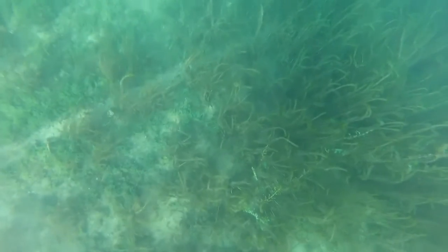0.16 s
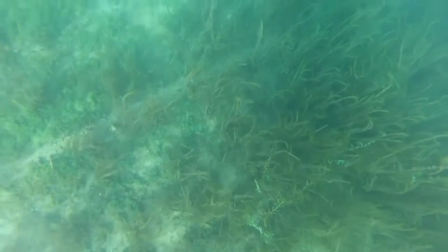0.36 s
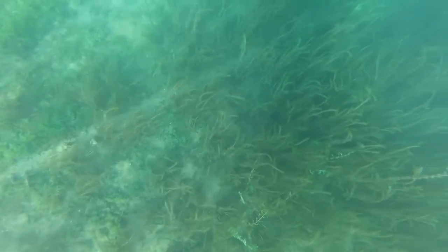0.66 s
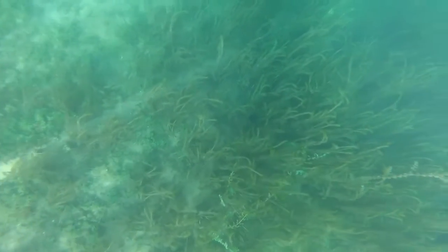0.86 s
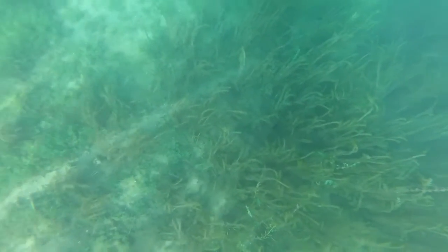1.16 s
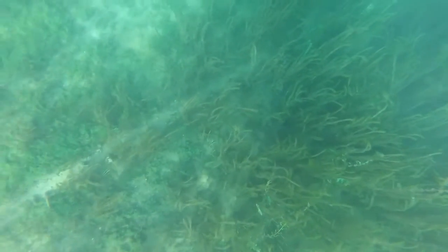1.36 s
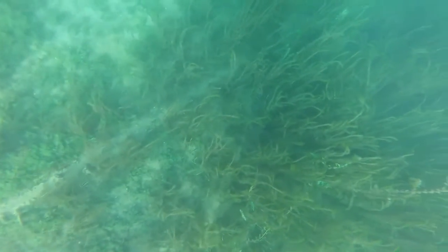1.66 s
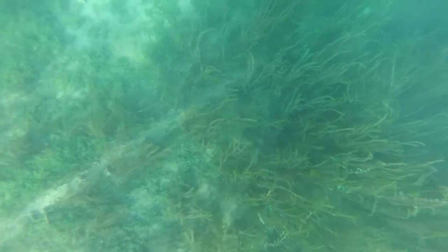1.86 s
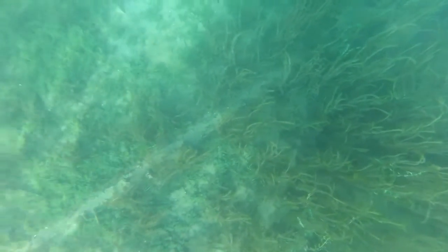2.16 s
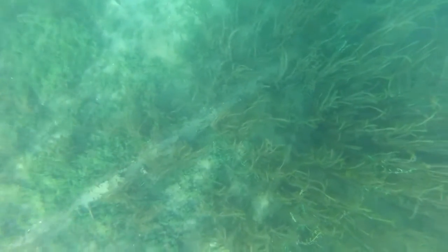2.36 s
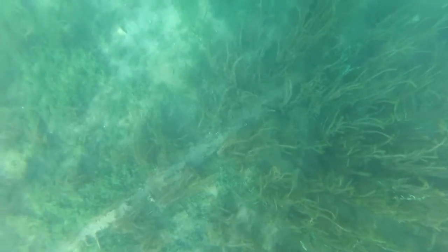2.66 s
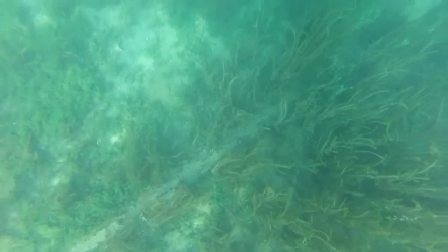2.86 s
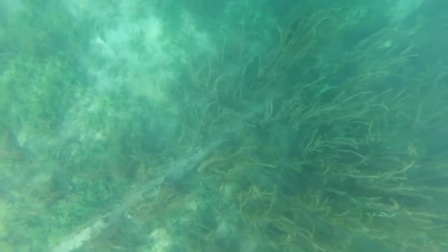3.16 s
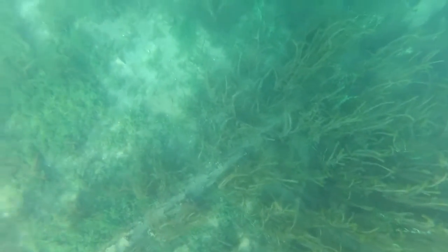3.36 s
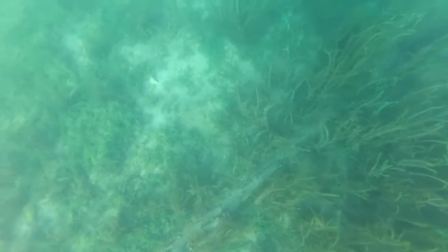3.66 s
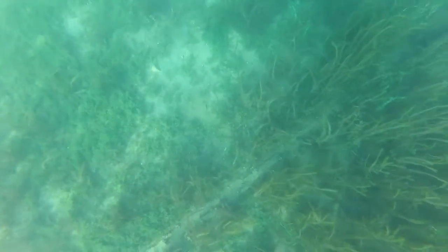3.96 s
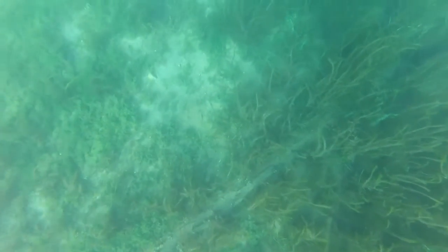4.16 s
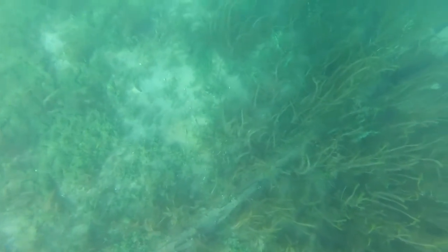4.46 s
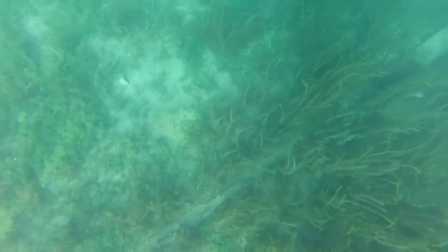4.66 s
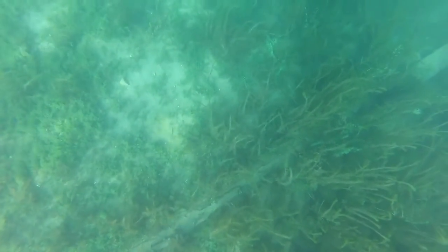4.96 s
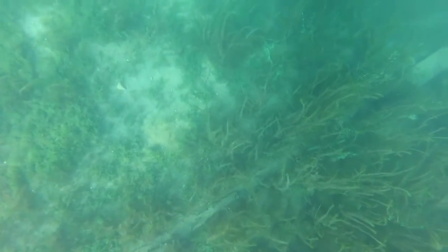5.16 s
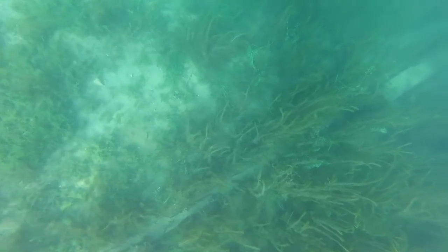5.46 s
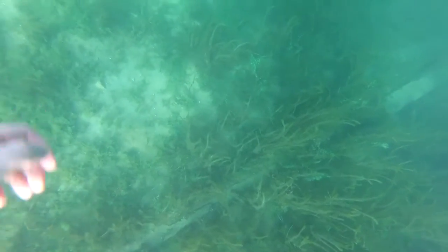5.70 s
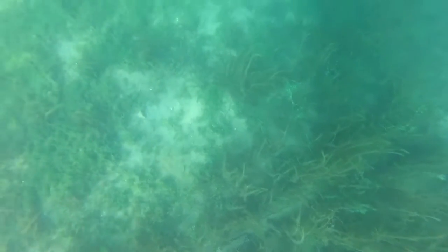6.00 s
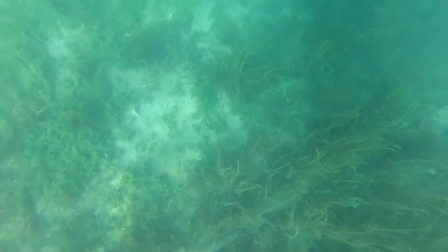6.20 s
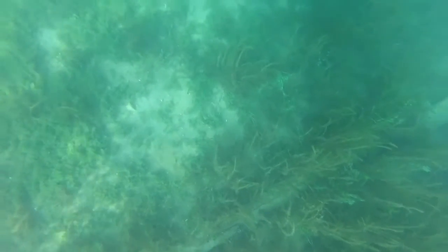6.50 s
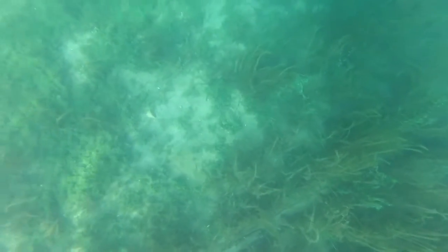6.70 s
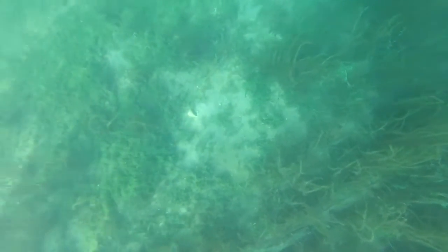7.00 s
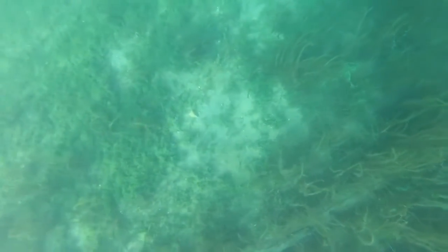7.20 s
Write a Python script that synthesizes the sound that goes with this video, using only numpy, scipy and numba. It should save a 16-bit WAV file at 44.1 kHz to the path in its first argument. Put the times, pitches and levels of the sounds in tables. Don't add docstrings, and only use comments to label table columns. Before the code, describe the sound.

Muffled underwater rumble with heavy low thumps, gulping trapped air, soft bubbling wash, a quick triple knock early on and faint hiss.

```python
import sys
import numpy as np
from scipy import signal
from scipy.fft import rfft, irfft, next_fast_len
from scipy.io import wavfile
from scipy.ndimage import uniform_filter1d
from numba import njit

SR = 44100
rng = np.random.default_rng(int(sys.argv[2]) if len(sys.argv) > 2 else 0)


def dump(signal):
    limited = np.clip(np.atleast_2d(signal).T, -1, 1)
    pcm = np.round(limited * 32767).astype(np.int16)
    wavfile.write(sys.argv[1], SR, pcm)


def gain_from_db(level_db):
    decades = np.asarray(level_db, float) / 20
    return 10 ** decades


N = 323694

# (time [s], level [dB])
GAIN = [
    (0, -70),
    (1.19, -66),
    (1.21, -67),
    (3, -65),
    (4.91, -63),
    (4.93, -67),
    (5.6, -65),
    (7.34, -64),
]
# (time [s], level [dB])
WATER = [(0.0, -35), (0.31, -37), (0.75, -34.5), (1.31, -33.5), (1.92, -35.5), (2.27, -36), (2.82, -34),
         (3.31, -36.5), (3.9, -34.5), (4.4, -32), (4.85, -34), (4.93, -38), (5.5, -38.5), (6.15, -33.5),
         (6.66, -35.5), (7.0, -32), (7.34, -34)]


def unit(x):
    return x / np.sqrt(np.mean(x ** 2))


def curve(table, column):
    rows = np.array(table)
    return np.interp(np.arange(N) / SR, rows[:, 0], rows[:, column])


def bumps(table, half_s):
    t = np.arange(N) / SR
    return sum(db * np.exp(-((t - s) / half_s) ** 2) for s, db in table)


def walk(rate_hz):
    hold = int(SR / rate_hz)
    steps = np.repeat(rng.standard_normal(N // hold + 1), hold)
    return unit(uniform_filter1d(uniform_filter1d(steps, hold), hold)[:N])


def colour(x, spectrum):
    hz, db = np.transpose(spectrum)
    size = next_fast_len(N)
    log_hz = np.log(np.fft.rfftfreq(size, 1 / SR) + 1)
    shape_db = np.interp(log_hz, np.log(hz), db, left=-90, right=-90)
    return irfft(rfft(x, size) * gain_from_db(shape_db), size)[:N]


def resonance(x, hz, width_hz):
    return signal.lfilter(*signal.iirpeak(hz, hz / width_hz, fs=SR), x)


@njit
def grains(start, size, hz, cycles, phase, rise, glide):
    out = np.zeros(N)
    for g in range(len(start)):
        length = cycles[g] * SR / hz[g]
        p = phase[g]
        for i in range(min(int(3 * length), N - start[g])):
            u = i / (rise * length)
            if u < 1:
                swell = np.sin(np.pi / 2 * u) ** 2
            else:
                swell = np.exp(-((u - 1) * rise / (1 - rise)) ** 1.5 * 2)
            p += 2 * np.pi * hz[g] * (1 + glide * i / length) / SR
            out[start[g] + i] += size[g] * swell * np.sin(p)
    return out


def played(table, trim_db, rise, glide, length_ms=None, cycles=None):
    s, db, hz, *own_ms = np.transpose(table)
    if cycles is None:
        cycles = hz * (own_ms[0] if own_ms else length_ms) / 1000
    phase = rng.uniform(0, 2 * np.pi, len(s))
    return grains((s * SR).astype(np.int64), gain_from_db(db + trim_db), hz, cycles + 0 * hz, phase, rise, glide)


def cloud(count, low_hz, high_hz, cycles, scatter_db, rise, glide):
    when, pitch, luck, phase, long = rng.random((count, 5)).T
    hz = low_hz * (high_hz / low_hz) ** pitch
    size = hz * gain_from_db(np.minimum(-scatter_db * np.log(1 - luck), 4 * scatter_db))
    start = (when * N).astype(np.int64)
    return grains(start, size, hz, cycles * (.5 + long), 2 * np.pi * phase, rise, glide)


def buffeting():
    # (time [s], level [dB])
    flow = [(0.1, -20.5), (0.3, -30), (0.88, -33.5), (1.38, -22.5), (1.98, -32), (2.12, -25), (2.77, -27.5),
            (2.99, -22), (3.4, -31.5), (4.03, -26.5), (4.41, -28.5), (4.81, -26), (5.17, -34.5),
            (5.81, -20.5), (6.06, -30.5), (6.32, -22.5), (6.8, -32.5), (7.1, -26)]
    # (time [s], level change [dB])
    lulls = [
        (0.58, -8),
        (1.86, -5),
        (2.87, -9),
        (4.26, -5),
        (5.4, -2.5),
        (6.56, -2.5),
    ]
    # (frequency [Hz], level per Hz [dB])
    eddy_spectrum = [(8.8, -36), (15, -6), (43, 1), (94, -4), (122, -6.5), (210, -21), (286, -27.5),
                     (330, -24), (430, -55), (730, -120)]
    # (onset [s], peak [dB], frequency [Hz])
    pushes = [(0.253, -11.5, 46.3), (0.685, -6, 102), (1.189, -15.5, 80), (1.41, -11, 75.5),
              (1.47, -8, 56.5), (1.518, -14, 63), (1.683, -11.5, 47.4), (1.959, -14.5, 59.5),
              (2.07, -10.5, 45.8), (2.142, -8, 70), (2.7, -18.5, 66.6), (2.801, -15.5, 119),
              (2.943, -10.5, 103), (3.033, -11.5, 62.4), (3.551, -13, 45.4), (4.081, -5.5, 52.7),
              (4.339, -17, 80), (4.602, -12, 45.8), (4.647, -8, 46), (5.121, -12.5, 45.8),
              (5.65, -8.5, 53.5), (5.782, -7, 75), (5.877, -10, 56.5), (5.985, -8.5, 45.5),
              (6.16, -14, 94.4), (6.356, -6.5, 103), (6.404, -7, 69.6), (6.921, -15, 71.4), (7.14, -14, 60),
              (7.224, -7, 60.4)]
    # (onset [s], peak [dB], frequency [Hz])
    slaps = [(0.127, -20, 94), (0.189, -15, 97.5), (0.767, -20, 135), (1.72, -17, 105), (1.788, -21, 98),
             (2.455, -4, 99.4), (2.71, -18.5, 148), (3.119, -13, 101), (3.88, -11.5, 108),
             (4.482, -21.5, 95), (4.947, -4, 98.7), (5.669, -13, 97.7), (5.888, -11.5, 94),
             (5.987, -13, 122), (6.299, -16.5, 122), (6.571, -17, 134), (7.239, -13, 137)]
    # (onset [s], peak [dB], frequency [Hz])
    rolls = [(0.022, -5, 80.2), (0.06, -12, 55.6), (1.248, -2.5, 52.4), (1.359, -9, 46.5),
             (2.43, -7.5, 66.6), (2.49, -15.5, 94.8), (3.102, -12, 46.3), (3.863, -11, 102.7),
             (4.937, -11, 77), (5.581, -10.5, 37.7), (5.829, -14.5, 75.6), (5.929, -8.5, 51.7),
             (6.38, -10.5, 53), (6.447, -9, 43.1), (7.207, -10.5, 82.7), (7.269, -16, 76.8)]
    small = cloud(count=2200, low_hz=17.8, high_hz=328.0, cycles=2.05, scatter_db=0.3, rise=0.37, glide=0.015)
    level_db = curve(flow, 1) + bumps(lulls, half_s=0.046) + 2.34 + 1.5 * walk(7.2)
    bed = unit(colour(small, eddy_spectrum)) * gain_from_db(level_db)
    opening_db, opening_s = -11.5, 0.0031
    bed -= gain_from_db(opening_db) * np.exp(-np.arange(N) / SR / opening_s)
    strong = played(pushes, -1.5, rise=0.46, glide=0.001, length_ms=30)
    strong += played(slaps, -1.1, rise=0.31, glide=0.001, length_ms=35.2)
    strong += played(rolls, -2.3, rise=0.1, glide=-0.013, length_ms=85.5)
    return bed + strong


def fizz_level():
    # (time [s], lift [dB])
    puffs = [
        (1.68, 2.5),
        (2.27, 3),
        (3.4, 2),
        (3.88, 3.5),
        (4.3, 2.5),
        (4.74, 4.5),
        (5.64, 7),
        (7.3, 4.5),
    ]
    wash_db, fizz_db = -35, -53.5
    follow_db_per_db = 0.37
    return fizz_db + follow_db_per_db * (curve(WATER, 1) - wash_db) + bumps(puffs, half_s=0.15)


def wash():
    # (frequency [Hz], level per Hz [dB])
    wash_spectrum = [(120, -33), (200, -9), (288, -9), (387, -5.5), (498, -0.5), (677, -3.5), (804, -3),
                     (975, -8), (1090, -7.5), (1240, -17.5), (1370, -17.5), (1500, -20.5), (1850, -21.5),
                     (2720, -29), (3050, -37), (3960, -71.5), (6710, -120)]
    far = unit(cloud(count=14000, low_hz=188.9, high_hz=4353.0, cycles=14.4, scatter_db=2.5, rise=0.28, glide=0.054))
    blur_filter = signal.butter(2, 4300, fs=SR, output="sos")
    blur = unit(signal.sosfilt(blur_filter, rng.standard_normal(N)))
    water = colour(far + blur, wash_spectrum)
    split_hz = 1250
    low = signal.sosfiltfilt(signal.butter(3, split_hz, "low", fs=SR, output="sos"), water)
    high = signal.sosfiltfilt(signal.butter(3, split_hz, "high", fs=SR, output="sos"), water)
    body = unit(low) * gain_from_db(curve(WATER, 1) - 0.62 + 1.16 * walk(13))
    fizz = unit(high) * gain_from_db(fizz_level() + 1.17 + .9 * walk(11))
    return body + fizz


def hiss():
    # (frequency [Hz], level per Hz [dB])
    hiss_spectrum = [(2600, -46.5), (3300, -11), (4300, -18.5), (5700, -15.5), (6150, -11.5), (6490, 0),
                     (7000, -7.5), (8700, -11), (10300, -19), (11900, -16.5), (13500, -20), (14700, -30.5)]
    return unit(colour(rng.standard_normal(N), hiss_spectrum)) * gain_from_db(curve(GAIN, 1))


def bubbles():
    # (onset [s], peak [dB], frequency [Hz])
    gulps = [(0.009, -13.5, 195), (0.696, -18.5, 157), (2.444, -16, 167), (2.559, -23, 240),
             (2.699, -17.5, 166.5), (3.133, -20, 164), (4.951, -20.5, 161), (5.667, -16.5, 163),
             (5.888, -24, 214), (5.988, -19.5, 167), (6.583, -16.5, 163)]
    # (onset [s], peak [dB], frequency [Hz], length [ms])
    large = [(0.373, -29, 706, 30), (0.446, -24.5, 481, 58), (0.653, -23, 670, 15), (1.149, -21, 516, 15),
             (1.181, -24, 578, 32), (1.244, -12.5, 365, 9.5), (1.282, -25, 444, 13), (1.639, -26, 483, 32),
             (2.229, -22.5, 480, 20), (2.349, -22.5, 547, 28), (2.749, -24.5, 478, 40),
             (3.515, -32.5, 1040, 9.4), (3.547, -21.5, 747, 15), (3.844, -23.5, 967, 16),
             (4.046, -25.5, 412, 43), (4.11, -20.5, 510, 10), (4.2, -21.5, 456, 11), (4.349, -23, 498, 42),
             (4.386, -16.5, 502, 30), (4.629, -25, 795, 35), (4.822, -25.5, 800, 36), (6.269, -29, 586, 38),
             (6.513, -23.5, 746, 13), (6.93, -17, 1023, 16), (6.944, -23, 717, 24), (7.089, -27, 754, 72),
             (7.2, -23, 390, 14), (7.219, -28, 982, 58), (7.283, -24, 764, 29)]
    # (onset [s], peak [dB], frequency [Hz])
    tiny = [(0.3134, -37, 1330), (0.653, -33.5, 1680), (0.788, -35.5, 1460), (1.0304, -35, 1470),
            (1.1578, -34.5, 1850), (1.6008, -35, 2250), (1.8168, -37, 2330), (2.2303, -36, 1340),
            (2.3494, -47, 2030), (2.5721, -45, 2310), (2.61, -38, 2380), (3.4428, -38, 1810),
            (3.869, -34.5, 2750), (3.8891, -30, 1320), (3.8901, -34.5, 2270), (3.9394, -39, 1310),
            (4.039, -38, 1370), (4.2507, -42, 1290), (4.45, -36, 1780), (4.6698, -36, 2570),
            (4.7501, -40, 2470), (6.862, -26.5, 1380), (7.0823, -40, 1960), (7.2993, -35, 2240)]
    out = played(gulps, -2.5, rise=0.16, glide=0.013, length_ms=25.6)
    out += played(large, -2.5, rise=0.16, glide=0.013)
    out += played(tiny, -3.7, rise=0.09, glide=0.0097, cycles=20)
    return out


def ticks():
    # (time [s], peak [dB], share that rings the port [0-1])
    tick_events = [
        (1.2015, -44, .05),
        (4.70, -53, .05),
        (4.8245, -47, .6),
        (4.88, -53, .05),
        (4.9146, -43, .05),
    ]
    port_hz, port_width_hz = 6490, 300
    step = signal.sosfilt(signal.butter(2, 2600, "high", fs=SR, output="sos"), np.ones(400))
    ring = resonance(step, port_hz, port_width_hz)
    out = np.zeros(N)
    for s, db, share in tick_events:
        tick = (1 - share) * step + share * ring / np.abs(ring).max()
        start = int(s * SR)
        out[start:start + 400] += gain_from_db(db + 6) * tick
    return out


def knocks():
    # (time [s], peak [dB])
    blows = [
        (1.241, -32),
        (1.4775, -18),
        (1.5207, -10),
        (1.5695, -17.5),
        (2.230, -27),
        (2.581, -31),
        (3.442, -31),
    ]
    # (frequency [Hz], width [Hz], level [dB])
    wall_modes = [(607, 300, 1), (1050, 510, 8), (1570, 660, 5.5), (2020, 550, 1.5), (2510, 450, -3.5)]
    bounce_s, rattle_s = .002, 0.0021
    rattle = np.exp(-(np.arange(600) / SR / rattle_s) ** 2)
    muffle = signal.cheby1(4, 1, 2800, fs=SR, output="sos")
    out = np.zeros(N)
    for s, db in blows:
        push = rattle * rng.standard_normal(600)
        push[[12, 12 + int(bounce_s * SR)]] += 22., 9.
        ring = np.zeros(600)
        for k, (hz, width_hz, mode_db) in enumerate(wall_modes):
            ring += (-1) ** k * gain_from_db(mode_db) * resonance(push, hz, width_hz)
        ring = signal.sosfilt(muffle, ring)
        start = int(s * SR)
        out[start:start + 600] += gain_from_db(db) * ring / np.abs(ring).max()
    return out


def scene():
    return (buffeting() + wash() + hiss() + bubbles() + ticks() + knocks())[None]


def drop_faint(x):
    faintest_db, treble_hz = -102.5, 3200
    hz, s, z = signal.stft(x, SR, nperseg=2048)
    power = uniform_filter1d(np.abs(z) ** 2, size=5, axis=0)
    frames = np.minimum(s * SR, N - 1).astype(int)
    limit_db = faintest_db + .75 * (curve(GAIN, 1) + 66) + .8 * walk(18)
    keep = (power > gain_from_db(2 * limit_db[frames])) | (hz[:, None] < treble_hz)
    return signal.istft(z * keep, SR, nperseg=2048)[1][:N]


def top_cut(x):
    return signal.sosfilt(signal.butter(12, 14400, fs=SR, output="sos"), x)


def record(dry):
    mix = drop_faint(dry[0])[None]
    return top_cut(mix)


dry = scene()
out = record(dry)
dump(out)
```